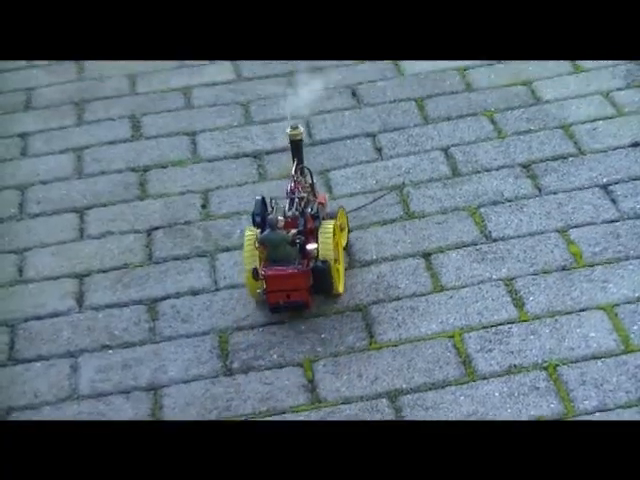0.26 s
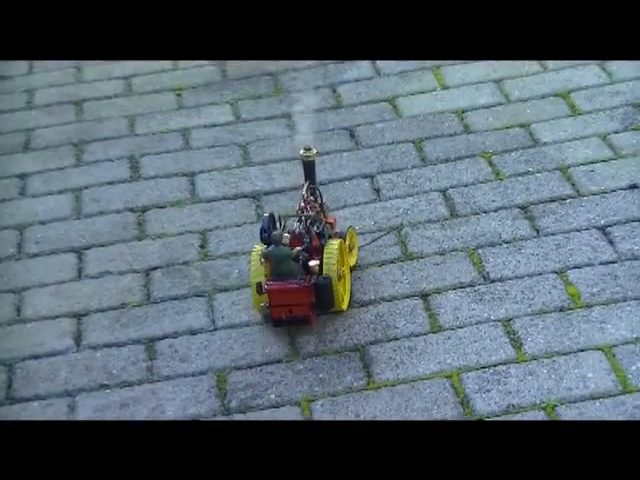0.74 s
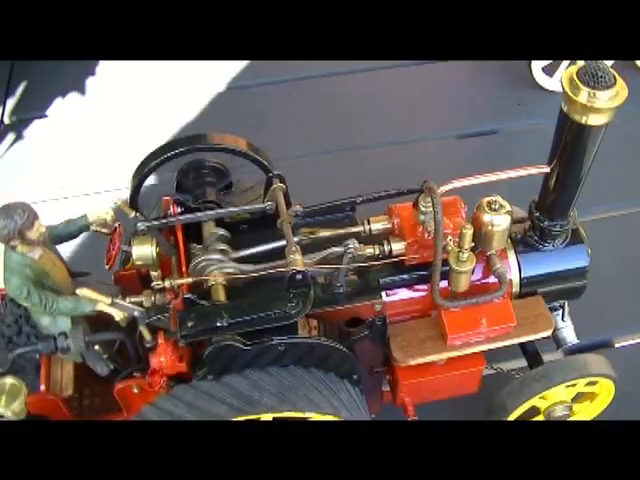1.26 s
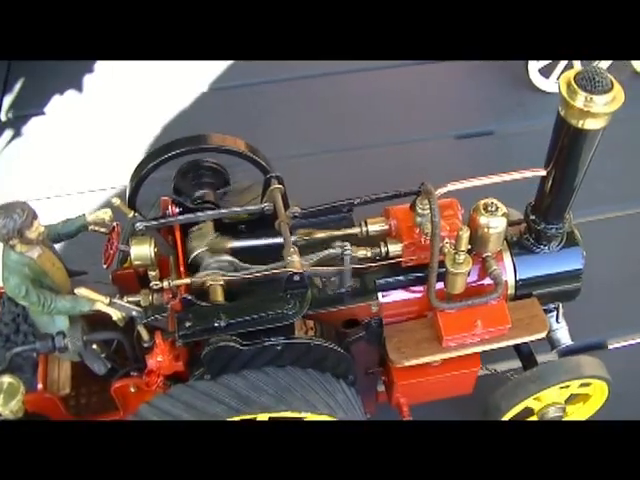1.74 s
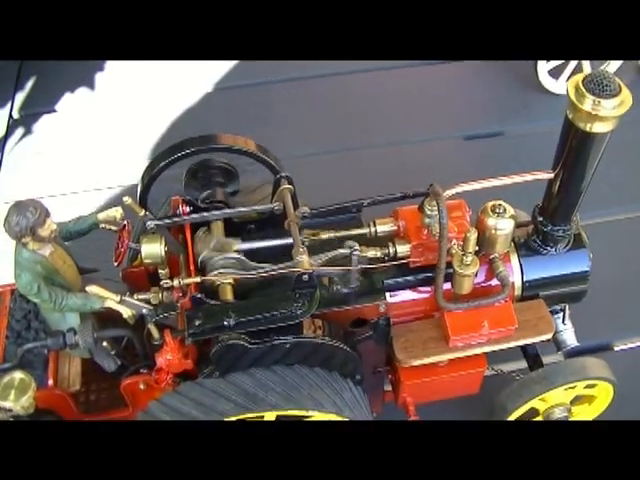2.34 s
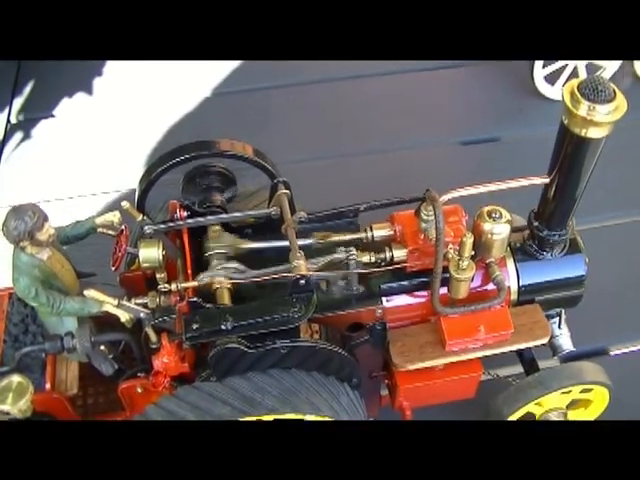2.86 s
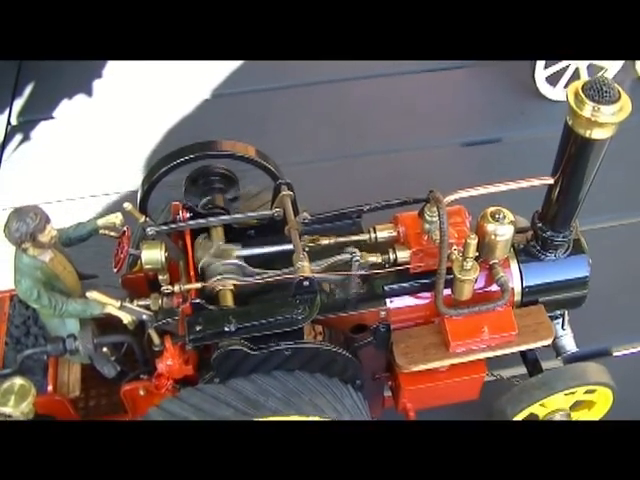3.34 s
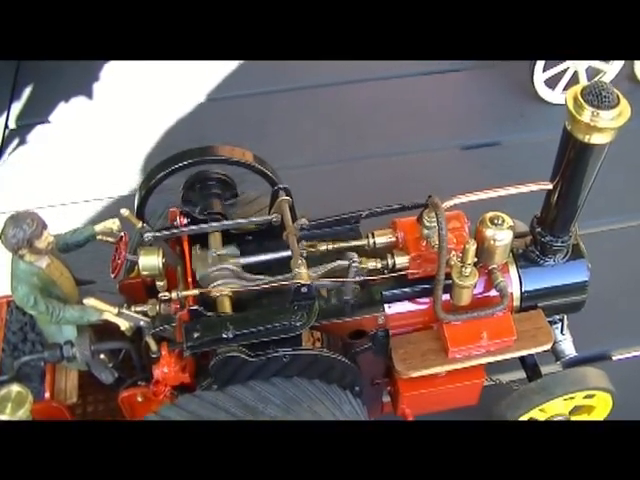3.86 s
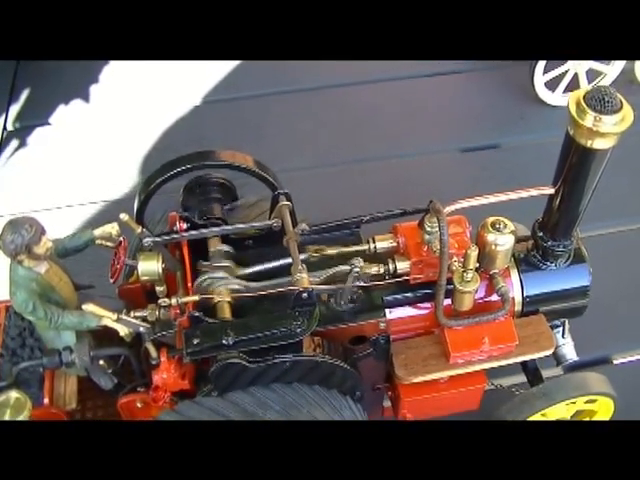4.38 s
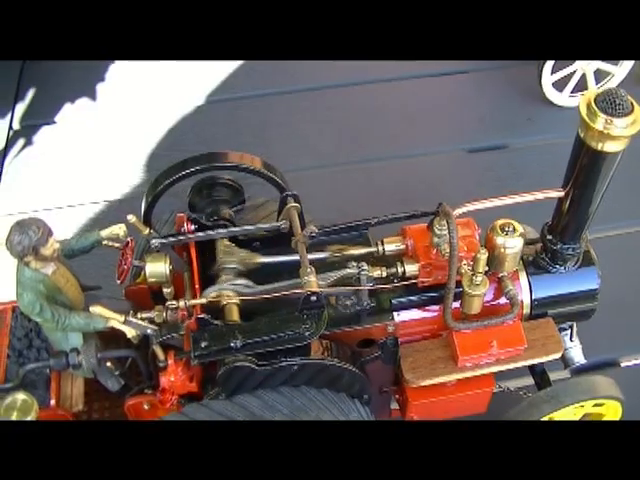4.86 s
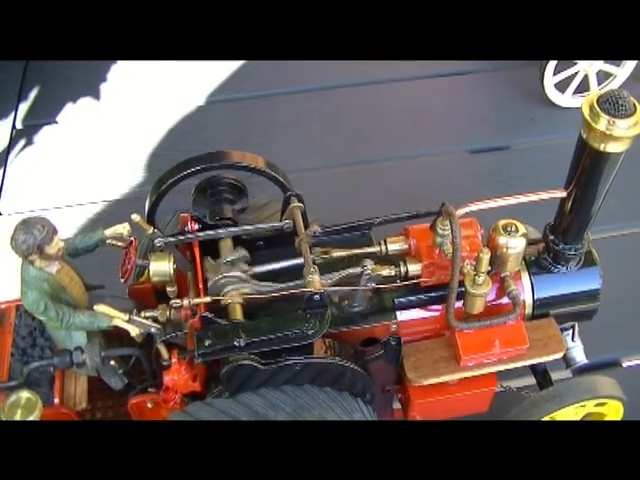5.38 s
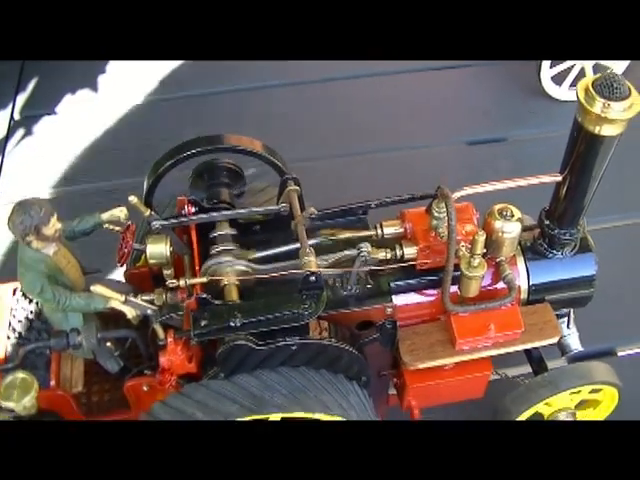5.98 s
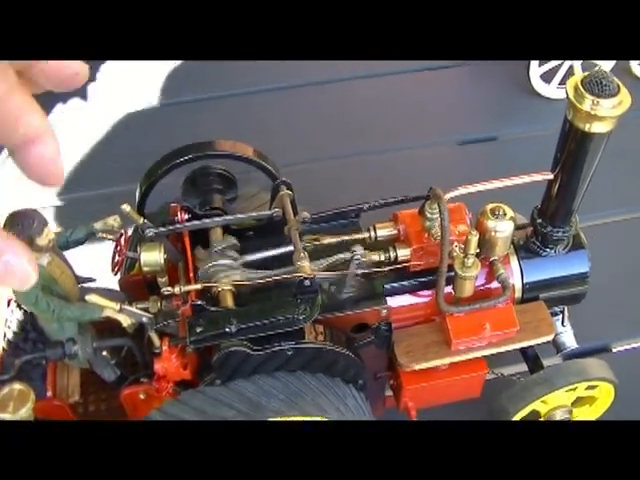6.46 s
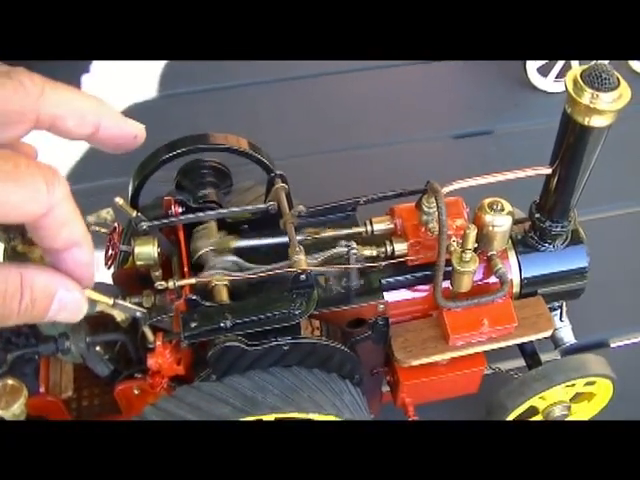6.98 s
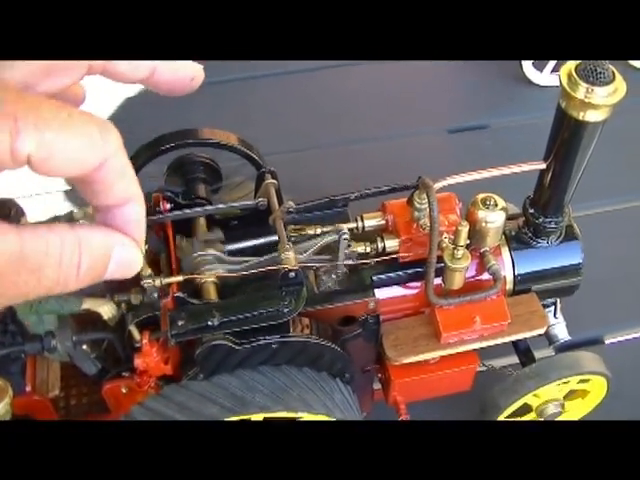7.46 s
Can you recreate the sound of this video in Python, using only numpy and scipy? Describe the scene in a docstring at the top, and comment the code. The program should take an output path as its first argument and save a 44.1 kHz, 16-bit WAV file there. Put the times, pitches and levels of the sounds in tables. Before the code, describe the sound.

Faint metallic rolling on stone cuts to a loud, rapid miniature steam engine chattering and hissing, its gears clanking as it slows at the end.

```python
"""Model steam traction engine

First it rattles, squeaks and hums over paving some way off; abruptly it is close by, running on the spot.
Each crank turn repeats the same knocks, which ring the modes of chassis, boiler, frame and linkage.
Exhaust steam is noise puffing with the crank; gear clanks strike the metal at set times.
At the end a lever takes the drive off: the engine slows, its gears clank, and boiler and steam die away."""
import sys
import numpy as np
from scipy import signal
from scipy.fft import rfft, irfft
from scipy.io import wavfile

SR = 44100
rng = np.random.default_rng(int(sys.argv[2]) if len(sys.argv) > 2 else 0)


def wav_out(sig):
    """Save sig, one row per channel (or a flat mono array), as 16-bit PCM at SR to the path in sys.argv[1]."""
    wavfile.write(sys.argv[1], SR, np.round(np.clip(np.atleast_2d(sig).T, -1, 1) * 32767).astype(np.int16))


N = 340452
TIME = np.arange(N) / SR

# crank speed: t/s, speed/(turns per s)
CRANK_SPEED = [(1.08, 17.874), (1.8, 18.303), (2.5, 18.786), (3.1, 19.216), (3.8, 19.451), (4.6, 19.763),
               (5.5, 20.234), (6.2, 20.545), (7.05, 20.648), (7.3, 19.5), (7.5, 14.5), (7.72, 10.0)]
# chassis modes: f/Hz, width/Hz, relative level/dB
CHASSIS_MODES = [(143, 25, -15.5), (186, 16.7, -4), (283, 41, -0.5), (351, 46, 5), (442, 127, 0),
                 (574, 56, 0.5), (670, 74, 2), (910, 105, -2.5)]
# frame modes: f/Hz, width/Hz, relative level/dB
FRAME_MODES = [(1530, 13, -20), (1714, 64, 1), (1893, 71, -0.5), (2140, 120, -17), (3375, 55, -5),
               (7020, 160, -14.5)]

CLOSE_S = 1.078  # far engine before, near engine after


def gain_of(db):
    """Amplitude factor of a level in dB."""
    return 10 ** (np.asarray(db) / 20)


def evened(x):
    """Scales to rms 1."""
    return x / np.sqrt(np.mean(x ** 2) + 1e-20)


def add(mix, s, sound):
    """Mixes a sound in at time s, cut off at the end of the mix."""
    part = mix[max(round(s * SR), 0):][:len(sound)]
    part += sound[:len(part)]


def swell(s, length_s):
    """Smooth rise and fall centred on s, length_s wide at half height."""
    return np.exp2(-(2 * (TIME - s) / length_s) ** 2)


def wander(hz):
    """Random smooth variation of rms 1: noise low-passed near hz."""
    lowpass = 1 / (1 + (np.fft.rfftfreq(N, 1 / SR) / hz) ** 4)
    return evened(irfft(rfft(rng.standard_normal(N)) * lowpass, N))


def shaped(x, points):
    """Filters x by a spectrum in dB, joined by straight lines over log frequency."""
    f, db = np.transpose(points)
    level_db = np.interp(np.log(np.fft.rfftfreq(N, 1 / SR) + 1), np.log(f), db)
    return irfft(rfft(x) * gain_of(level_db), N)


def colour(x, points):
    """Filters x by a smooth spectrum, then scales to rms 1."""
    return evened(shaped(x, points))


def ring(x, modes):
    """Blows excite decaying modes of alternating sign; the response has energy 1."""
    t = np.arange(SR // 8) / SR
    response = np.zeros(len(t))
    for k, (hz, width_hz, db) in enumerate(modes):
        decay = width_hz * np.exp(-np.pi * width_hz * t)
        response += (-1) ** k * gain_of(db) * decay * np.sin(2 * np.pi * hz * t)
    # a small part radiates little below its lowest mode
    highpass = signal.butter(2, modes[0][0] * 0.95, "high", fs=SR, output="sos")
    response = signal.sosfilt(highpass, response)
    return signal.oaconvolve(x, response / np.linalg.norm(response))[:N]


def blow(scrape_ms, scrape_db):
    """A click with a dying scrape of metal on metal (level relative to the click); energy 1."""
    ms = np.arange(SR // 50) / SR * 1000
    scrape = rng.standard_normal(len(ms)) * np.exp(-ms / scrape_ms)
    force = gain_of(scrape_db) * scrape / np.linalg.norm(scrape)
    force[0] += 1
    return force / np.linalg.norm(force)


def grains(per_s, spread_db):
    """Sparse random clicks of very uneven size, rms 1."""
    hits = rng.random(N) < per_s / SR
    size_db = spread_db * np.minimum(rng.exponential(1, N), 4)
    return evened(hits * rng.standard_normal(N) * gain_of(size_db))


def speed_per_s():
    """Crank speed in turns per s, joined by straight lines in time."""
    s, speed = np.transpose(CRANK_SPEED)
    return np.interp(TIME, s, speed)


def crank(first_clack_s=1.0943):
    """Crank angle in turns, the integral of speed; whole at each main clack."""
    turns = np.cumsum(speed_per_s()) / SR
    return turns - np.interp(first_clack_s, TIME, turns)


def effort(part, lever_s=7.04, lever_takes_s=0.063):
    """Gain of a part: set by speed, by a shaking resonance in speed, and by the lever."""
    cruise_speed, shake_speed, shake_width = 19.47, 20.6, .2  # turns per s
    # loudness by part: base level/dB, rise/(dB per extra turn per s), extra at shaking speed/dB,
    # change once the lever is moved/dB
    loudness = {"chassis": (-44, 1.5, -1.2, -6.5), "boiler": (-31, -0.74, 4, 2.5),
                "frame": (-33.5, 1.03, 2.5, -1.5), "linkage": (-27.5, 1, -1.5, -12),
                "steam": (-29, -0.16, 0, -1.5)}
    cruise_db, speed_db, shake_db, lever_db = loudness[part]
    speed = speed_per_s()
    shake = 1 / (1 + ((speed - shake_speed) / shake_width) ** 2)
    lever = np.clip((TIME - lever_s) / lever_takes_s, 0, 1)
    return gain_of(cruise_db + speed_db * (speed - cruise_speed) + shake_db * shake + lever_db * lever)


def dying(start_s=7.335, db_per_s=31.5):
    """Fade of the last slow turns, linear in dB."""
    return gain_of(-db_per_s * np.maximum(TIME - start_s, 0))


def air(level_db=-47.5):
    """Steady background: noise with a smooth spectrum."""
    # air spectrum: f/Hz, relative level per Hz/dB
    air_points = [(20, -30), (60, -17), (110, -10.5), (260, 8), (900, 12.5), (3000, 7.5), (15000, -16)]
    return gain_of(level_db) * colour(rng.standard_normal(N), air_points)


def bumps():
    """Bumps in the paving, as a rise of the rattle level in dB."""
    # bumps: centre t/s, length/s, rise of rattle level/dB
    bump_rows = [(0, 0.078, 5.5), (0.548, 0.063, 2.5), (0.643, 0.055, 3), (0.732, 0.065, 4),
                 (0.908, 0.028, 4.5)]
    return sum(db * swell(s, length_s) for s, length_s, db in bump_rows)


def rattle(wheels_db=-4):
    """Metal wheels jolt over stone: coloured noise and clicks plus the ringing of the wheels."""
    # paving spectrum: f/Hz, relative level per Hz/dB
    stone_points = [(60, -27), (150, -28), (260, -15), (450, -3.5), (700, -1.5), (1050, 4), (1700, 2.5),
                    (2300, -7.5), (4600, -3), (6000, -16), (9000, -21), (11500, -16), (15000, -38)]
    # wheel modes: f/Hz, width/Hz, relative level/dB
    wheel_modes = [(470, 32, -4.5), (1005, 18, 8), (1426, 18, 2), (1490, 60, -4), (1690, 37, -8),
                   (1760, 50, -6)]
    jolts = grains(per_s=900, spread_db=2) + .8 * rng.standard_normal(N)
    jolts = jolts * gain_of(1.8 * wander(40))
    return evened(colour(jolts, stone_points) + gain_of(wheels_db) * evened(ring(jolts, wheel_modes)))


def grit():
    """Grit under the wheels: sparse bright clicks."""
    points = [(600, -45), (1500, -25), (4500, -4), (11000, 1), (14000, -18)]  # f/Hz, relative level/dB
    return colour(grains(per_s=390, spread_db=4.5), points)


def squeak(whistle_db=-70, lower_hz=7951, upper_hz=11865):
    """Rubbing makes two unsteady sine tones, swelling out of a faint whistle."""
    # squeaks: centre t/s, length/s, lower tone swell/dB, upper tone swell/dB
    squeak_rows = [(0, 0.19, -56, -52), (0.273, .08, -56, -58), (.4, 0.088, -64, -58),
                   (0.557, 0.058, -56, -53), (.73, 0.1, -67, -48), (.905, 0.036, -52, -47),
                   (0.978, 0.043, -56, -45), (1.055, .07, -54, -72)]
    rubbing = np.full((2, N), gain_of(whistle_db))
    for s, length_s, *tones_db in squeak_rows:
        rubbing += np.outer(gain_of(tones_db), swell(s, length_s))
    tones = np.zeros(N)
    for level, hz in zip(rubbing, (lower_hz, upper_hz)):
        flutter = gain_of(2 * wander(25))
        phase = 2 * np.pi * np.cumsum(hz + 18 * wander(90)) / SR
        tones += level * flutter * np.sin(phase)
    return tones


def hum():
    """Faint sine tones that come and go while it rolls, unsteady in level."""
    # hums: centre t/s, length/s, f/Hz, swell level before flutter/dB
    hum_rows = [(.02, 0.14, 265, -57), (.62, 0.38, 317, -54), (1.02, 0.27, 264, -61)]
    flutter = gain_of(2 * wander(12))
    tones = sum(gain_of(db) * swell(s, length_s) * np.sin(2 * np.pi * hz * TIME)
                for s, length_s, hz, db in hum_rows)
    return flutter * tones


def paving(rattle_db=-45, grit_db=-60, grit_per_rattle=2.7):
    """The far engine rolls over gritty stone; a bump raises the grit more steeply than the rattle."""
    bump_db = bumps()
    rolling = rattle() * gain_of(rattle_db + bump_db)
    crunch = grit() * gain_of(grit_db + grit_per_rattle * bump_db)
    return rolling + crunch + squeak() + hum()


def gears(clank_db=4, thud_db=-18, scrape_ms=3.3):
    """Gear teeth strike and scrape now and then, most as the engine slows; gears, frame and chassis ring."""
    # clanks: t/s, relative strength/dB, relative frame strength/dB
    clank_rows = [(1.9162, -0.5, 2.5), (1.972, -4, -2), (2.0762, -16, 3), (2.506, 2, 0.5), (3.760, -4, 3.5),
                  (7.228, -4.5, -3.5), (7.286, 1.5, -0.5), (7.332, -4, -5), (7.342, -5, -16),
                  (7.388, -2.5, -5.5), (7.4054, 0, -14), (7.446, -2, -5), (7.4735, 2.5, -23),
                  (7.513, -0.5, -7), (7.545, -0.5, -8), (7.5895, -2.5, -10), (7.6295, 1, -11),
                  (7.682, -3, -5.5)]
    # gear modes: f/Hz, width/Hz, relative level/dB
    gear_modes = [(2650, 400, -2.5), (3450, 240, 7), (4560, 1100, -4.5), (5800, 410, -0.5),
                  (8240, 1100, -12), (9900, 1500, -12.5), (13300, 1600, -19)]
    on_gear, on_frame, on_chassis = np.zeros((3, N))
    for s, strength_db, frame_db in clank_rows:
        add(on_gear, s, gain_of(strength_db + clank_db) * blow(scrape_ms, scrape_db=10))
        add(on_frame, s, gain_of(frame_db + clank_db) * blow(scrape_ms, scrape_db=4))
        add(on_chassis, s, gain_of(strength_db + thud_db + clank_db) * blow(scrape_ms, scrape_db=-6))
    return ring(on_gear, gear_modes) + ring(on_frame, FRAME_MODES) + ring(on_chassis, CHASSIS_MODES[2:])


def steam(turns, opens=-0.016, puff_turns=0.24, return_db=-9, leak_db=-11, spit_db=-3):
    """Wet steam spits once a turn, more weakly on the return stroke, over a steady leak."""
    # steam spectrum: f/Hz, relative level per Hz/dB
    steam_points = [(40, -72), (150, -23), (300, -14.5), (800, -9.5), (1300, 1), (2400, 0.5), (3300, 1),
                    (4500, -2), (7300, -3.5), (9000, -10.5), (11500, -14), (13500, -22), (16000, -25)]
    puff = np.exp(-((turns - opens) % 1) / puff_turns)
    back = np.exp(-((turns + 0.39) % 1) / puff_turns)
    flow = np.sqrt(puff ** 2 + (gain_of(return_db) * back) ** 2 + gain_of(leak_db) ** 2)
    jet = rng.standard_normal(N) + gain_of(spit_db) * grains(per_s=6000, spread_db=1.5)
    return colour(jet * flow, steam_points) * effort("steam") * dying()


def teeth(turns, count=96):
    """Gear teeth and slides pass the same small bumps in every turn; the pattern drifts slowly."""
    step = np.floor(turns * count).astype(int)
    early, late = rng.standard_normal((2, count))[:, step % count]
    blend = np.pi * turns / turns[-1]
    passing = np.diff(step, prepend=step[0])
    return evened(passing * (early * np.cos(blend) + late * np.sin(blend)))


def knocking(turns, column, scrape_db, uneven_db, looseness=0.97):
    """Force on one part as joints take up their play, at the same crank angles in every turn."""
    # knocks: angle from main clack/turns, then relative strength/dB on chassis, boiler, frame, linkage,
    # timing scatter at looseness 1/ms, scrape decay/ms
    knocks = [(-.43, -36, -8, -29, -15, 0.14, 0.18), (-.37, -14, -4, 8, -23, .1, 2.4),
              (-.33, -25, -4, 11, -10, .15, 0.68), (-.27, -12, 1, -10, -19, 0.14, 1.3),
              (-.165, 4, -3.5, 2, -16, 0.23, 1.2), (-.102, -10, -7.5, -17, -3, .25, 0.86),
              (-.011, -31, -4.5, 3, 1, .1, 0.89), (.07, -31, -5, 3.5, -6.5, .5, 6.3),
              (.15, -38, -1.5, 7.5, -9, .2, 2.2), (.235, 7, -13, -23, -40, 0.077, 1.4),
              (.31, 1, -6.5, -7, -27.5, .1, .5), (.385, 5, -11.5, 1.5, -40, 0.062, 1.9)]
    force = np.zeros(N)
    whole_turns = np.arange(np.ceil(turns[0]) + 1, np.floor(turns[-1]) + 1)
    for knock in knocks:
        angle, scatter_ms, scrape_ms = knock[0], knock[-2], knock[-1]
        for s in np.interp(whole_turns + angle, turns, TIME):
            late, size = rng.standard_normal(2)
            hit = gain_of(knock[column] + uneven_db * size) * blow(scrape_ms, scrape_db)
            add(force, s + late * looseness * scatter_ms / 1000, hit)
    return evened(force)


def chassis(turns):
    """Thuds: knocks and passing teeth ring the chassis."""
    force = knocking(turns, column=1, scrape_db=-20, uneven_db=.5, looseness=.4)
    thuds = evened(ring(force + gain_of(-8) * teeth(turns), CHASSIS_MODES))
    return thuds * effort("chassis")


def boiler(turns):
    """Knocks and passing teeth ring the boiler, which dies away at the end."""
    # boiler modes: f/Hz, width/Hz, relative level/dB
    boiler_modes = [(690, 22, -11), (1016.4, 130, -5), (1092, 81, 1.5), (1220.4, 54, -0.5), (1536, 62, -9)]
    force = knocking(turns, column=2, scrape_db=-7, uneven_db=1.1, looseness=.4)
    ringing = evened(ring(force + gain_of(-6.5) * teeth(turns), boiler_modes))
    return ringing * effort("boiler") * dying()


def frame(turns):
    """Rattle: knocks and passing teeth ring the frame."""
    force = knocking(turns, column=3, scrape_db=-3, uneven_db=1.2, looseness=.5)
    ringing = evened(ring(force + gain_of(-8.5) * teeth(turns), FRAME_MODES))
    return ringing * effort("frame")


def linkage(turns, crack_db=-5.0):
    """Clacks: knocks ring the linkage, and steel on steel also radiates the bare blow as a dry crack."""
    # linkage modes: f/Hz, width/Hz, relative level/dB
    linkage_modes = [(1660, 234, -44), (2808, 112, 4), (3288, 200, 3.5), (3570, 303, 4.5),
                     (5000, 2800, -21.5), (5390, 95, -1.5), (6930, 170, -8.5), (7440, 104, -0.5),
                     (9370, 190, -5.5), (9900, 365, -10), (11700, 800, -12), (12800, 500, -7.5),
                     (14900, 360, -19)]
    crack_points = [(300, -40), (1500, -9), (3200, 0), (8000, -2), (11000, -7),
                    (13300, -6), (14200, -16), (16000, -20)]  # f/Hz, relative level/dB
    force = knocking(turns, column=4, scrape_db=3, uneven_db=.5)
    clacks = evened(ring(force, linkage_modes)) + gain_of(crack_db) * colour(force, crack_points)
    return evened(clacks) * effort("linkage")


def motion(turns):
    """Chassis, boiler, frame and linkage each ring under the knocks."""
    return chassis(turns) + boiler(turns) + frame(turns) + linkage(turns)


def side_of(mid):
    """Faint diffuse side noise that follows mid, and a very faint low rumble; opposite in the channels."""
    # side spectrum, nearly absent around 1100 to 1600 Hz: f/Hz, level relative to mid/dB
    apart_points = [(100, -58), (400, -23.5), (700, -21.5), (1100, -47), (1600, -87), (2500, -16.5),
                    (6000, -19.5), (15000, -32.5)]
    t = TIME[:SR // 16]
    smear = rng.standard_normal(len(t)) * np.exp(-t / 0.003)
    diffuse = signal.oaconvolve(mid, smear / np.linalg.norm(smear))[:N]
    rumble = colour(rng.standard_normal(N), [(60, 0), (200, -12), (1000, -50)])
    return shaped(diffuse, apart_points) + gain_of(-93) * rumble


def scene():
    """The far engine gives way abruptly to the near one; the sound is almost mono."""
    turns = crank()
    near = gears() + steam(turns) + motion(turns)
    mid = air() + np.where(TIME < CLOSE_S, paving(), near)
    side = side_of(mid)
    return np.array([mid + side, mid - side])


def record(dry, edge_hz=16000):
    """Band limit: a steep linear-phase low-pass."""
    lowpass = signal.firwin(511, edge_hz, window=("kaiser", 9), fs=SR)
    return signal.oaconvolve(dry, lowpass[None], "same")


dry = scene()
out = record(dry)
wav_out(out)
```